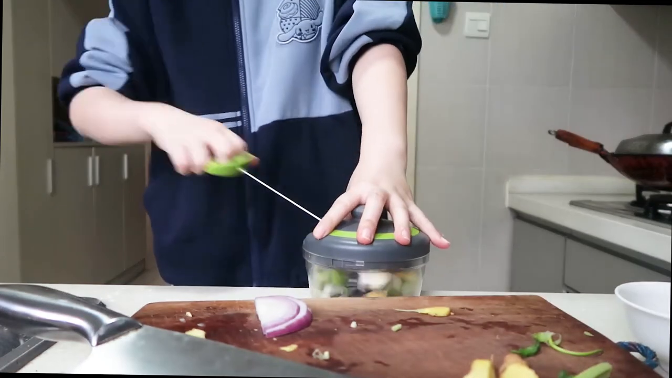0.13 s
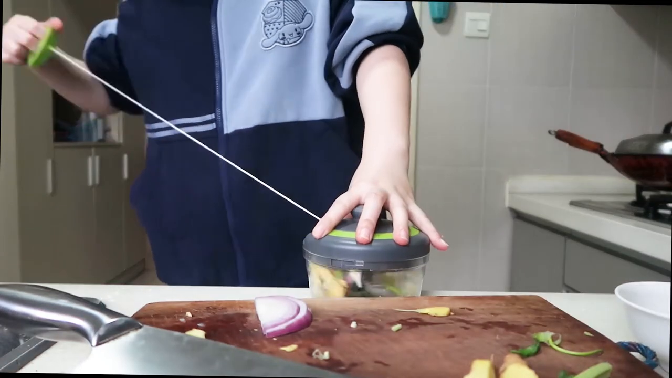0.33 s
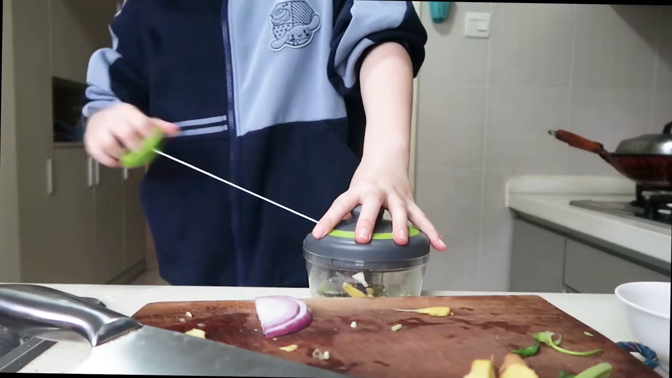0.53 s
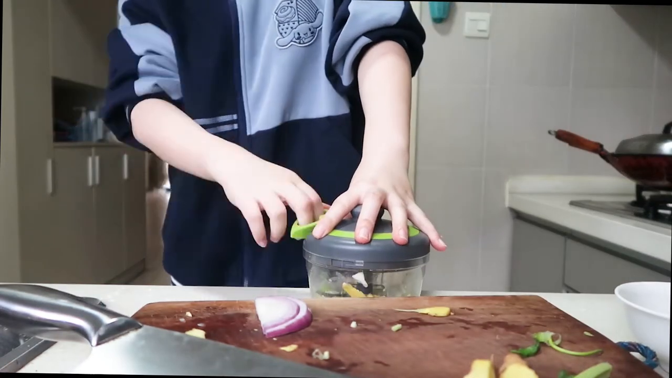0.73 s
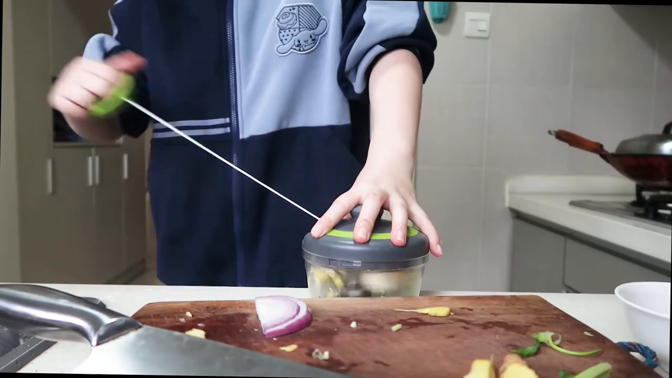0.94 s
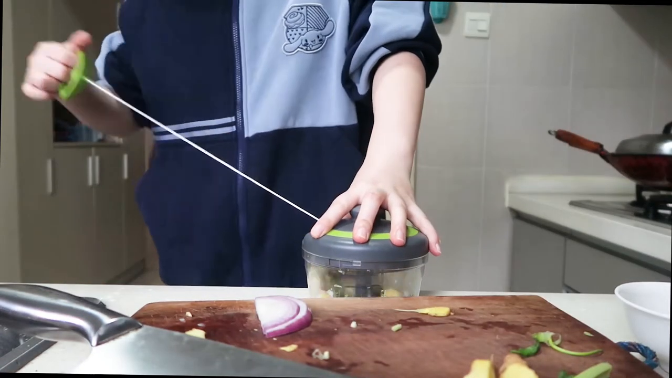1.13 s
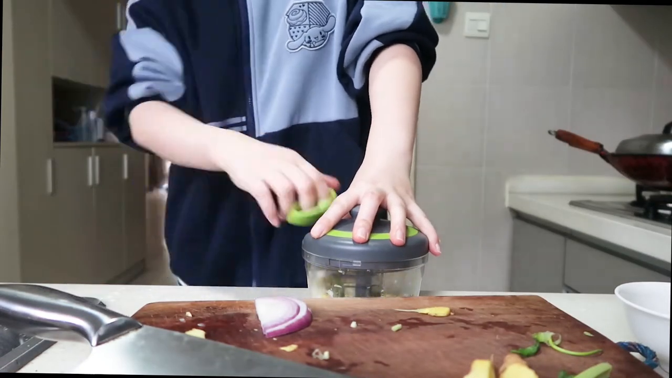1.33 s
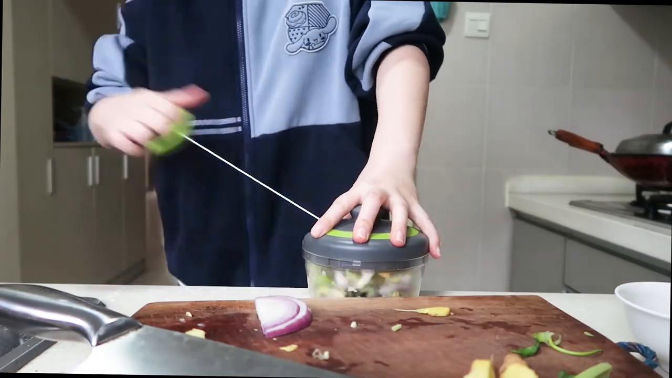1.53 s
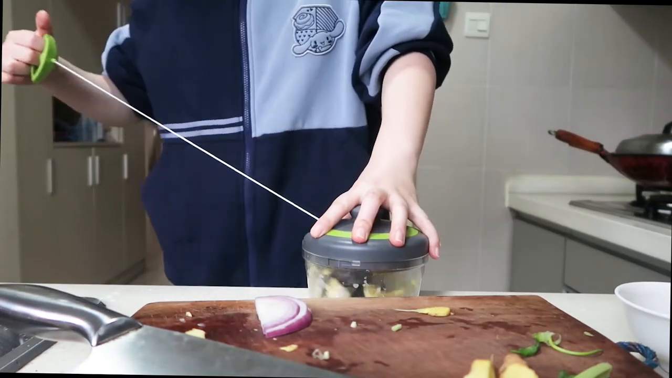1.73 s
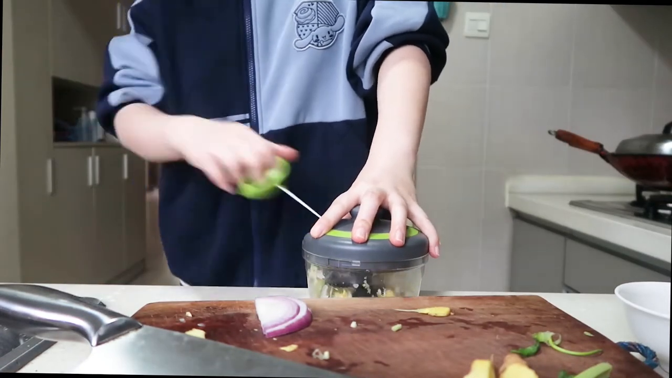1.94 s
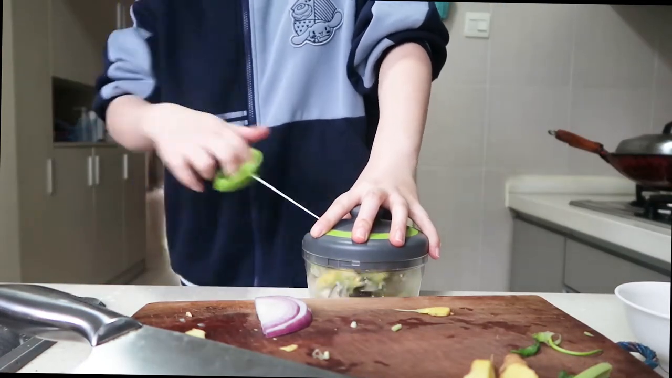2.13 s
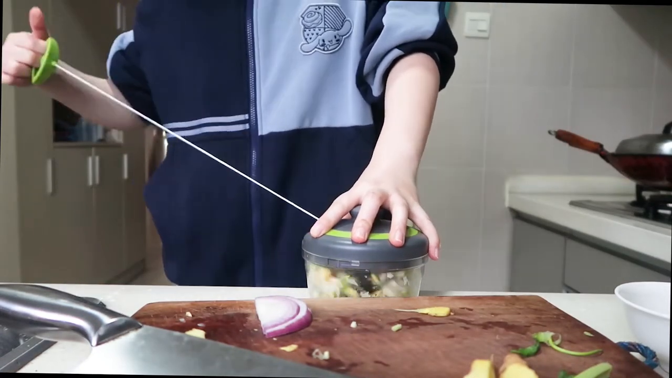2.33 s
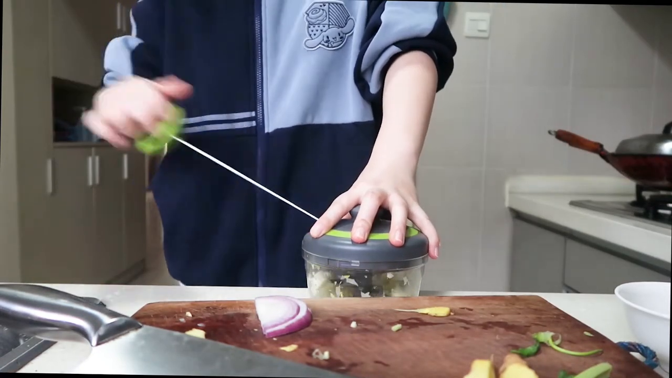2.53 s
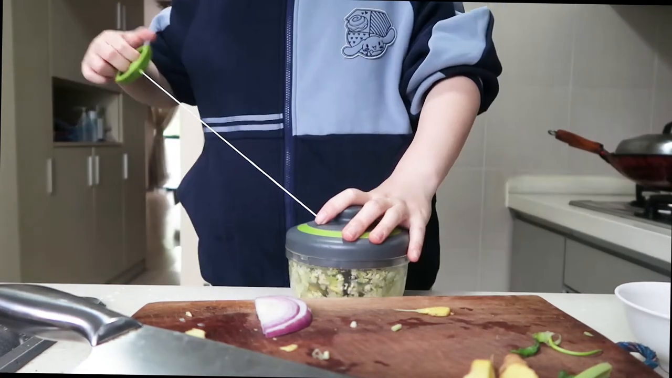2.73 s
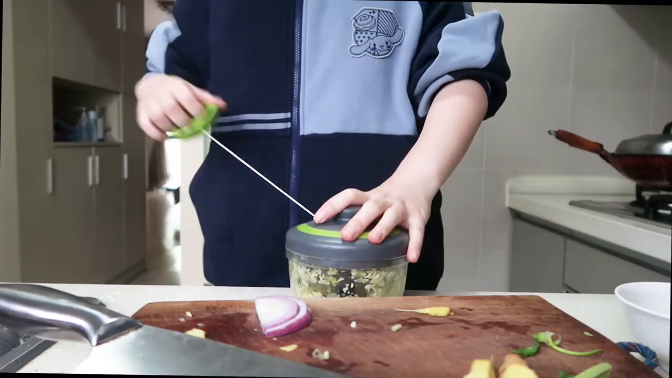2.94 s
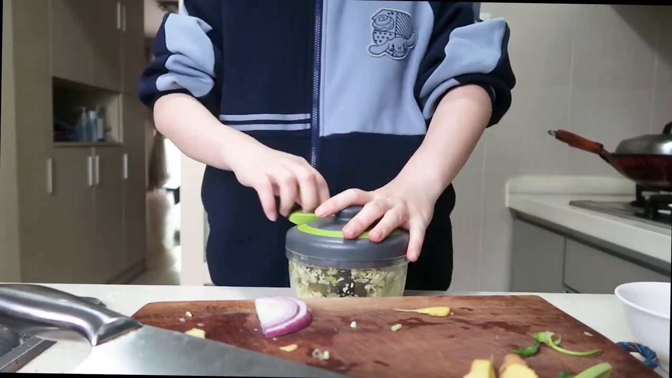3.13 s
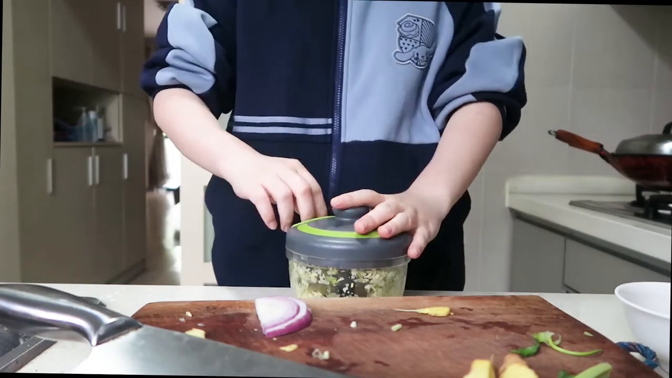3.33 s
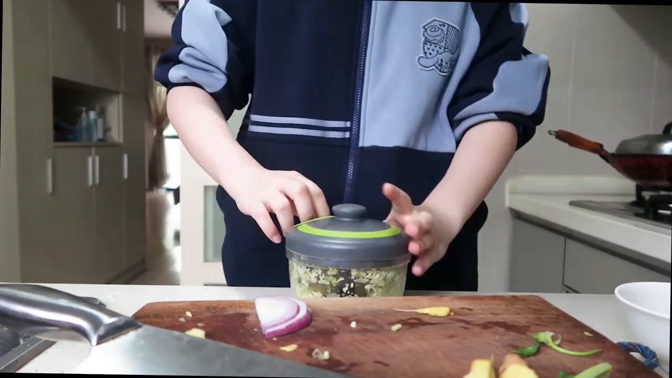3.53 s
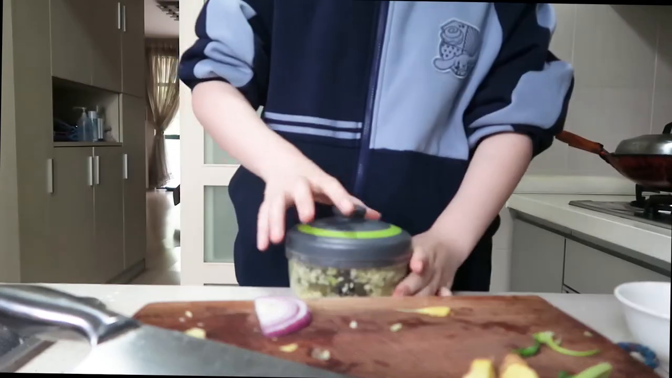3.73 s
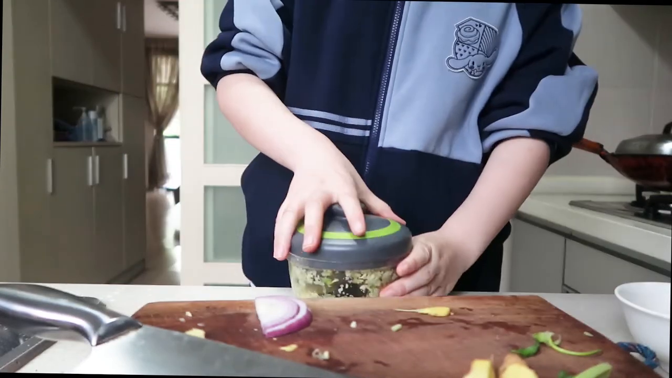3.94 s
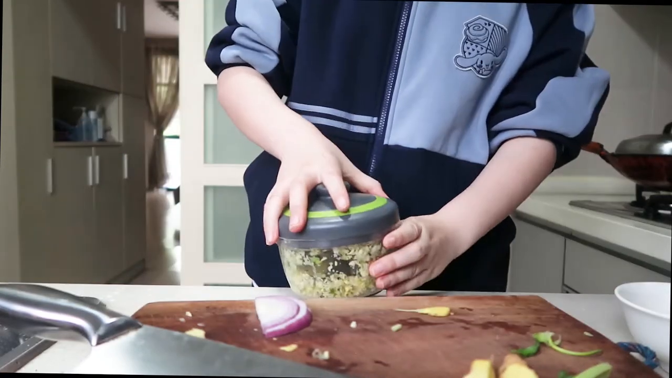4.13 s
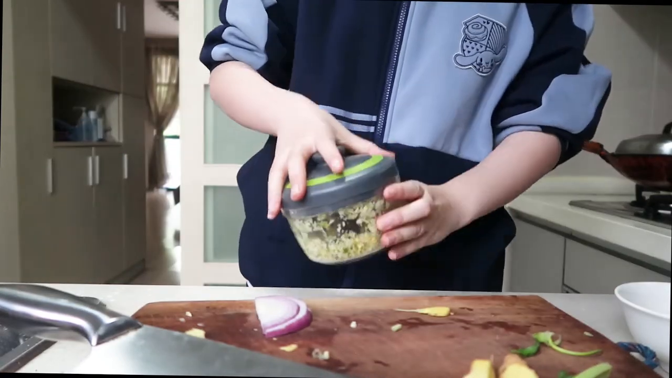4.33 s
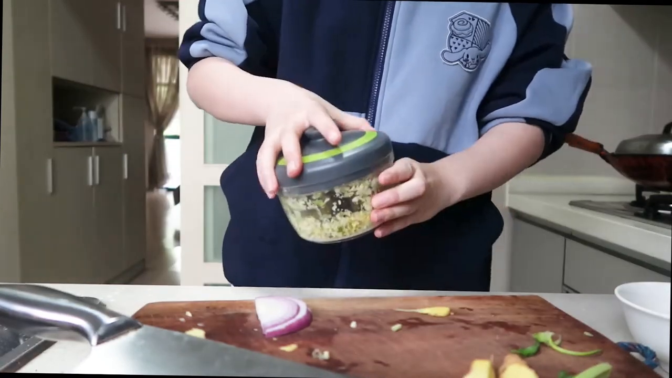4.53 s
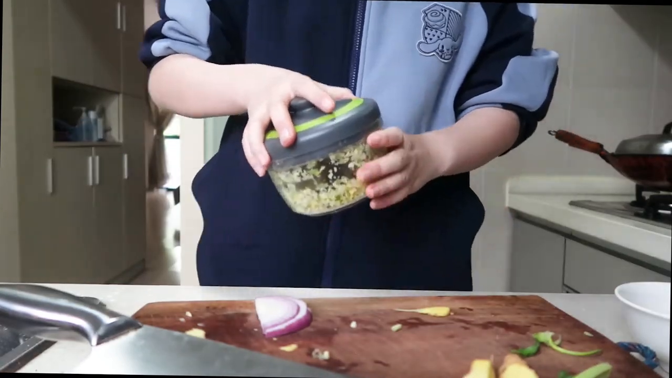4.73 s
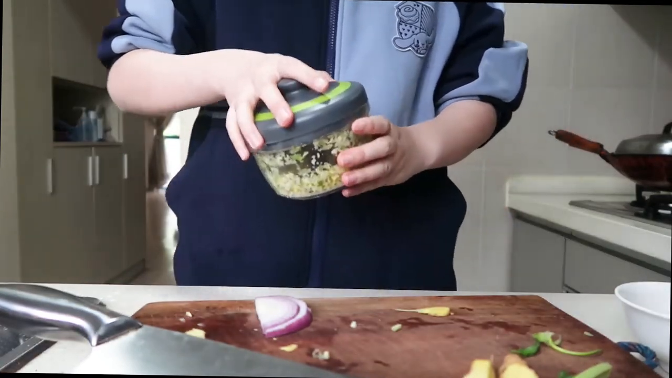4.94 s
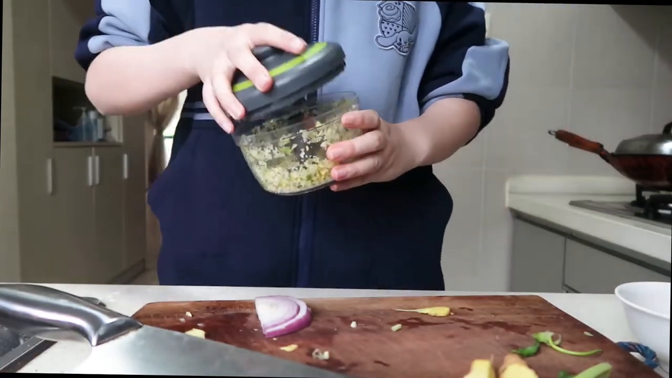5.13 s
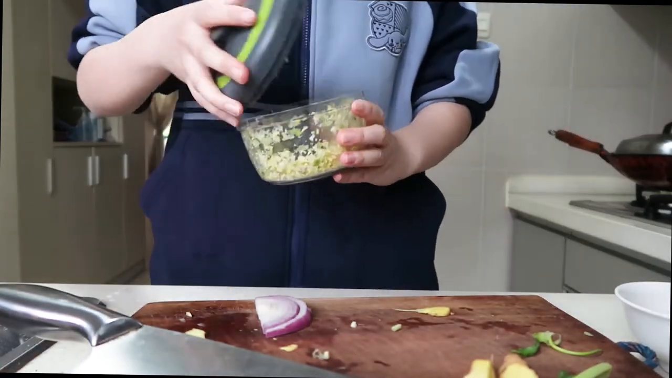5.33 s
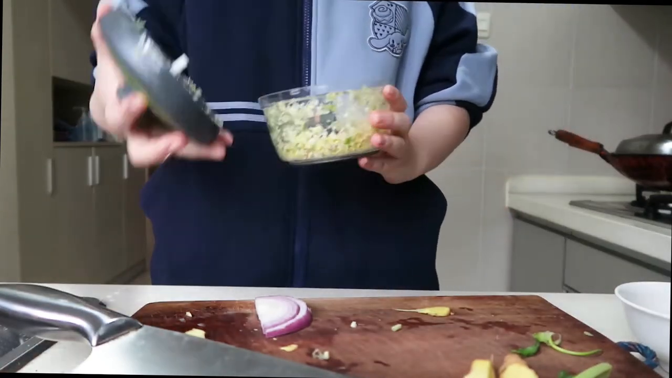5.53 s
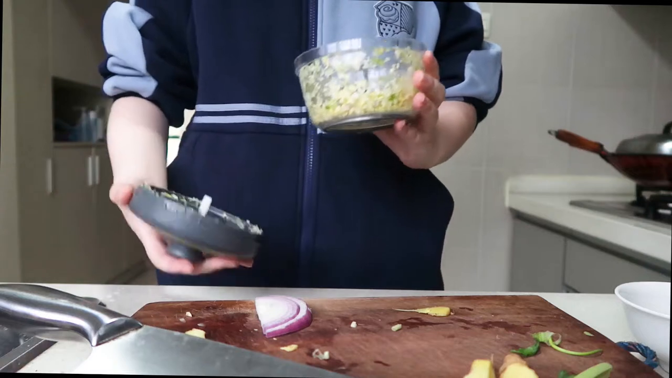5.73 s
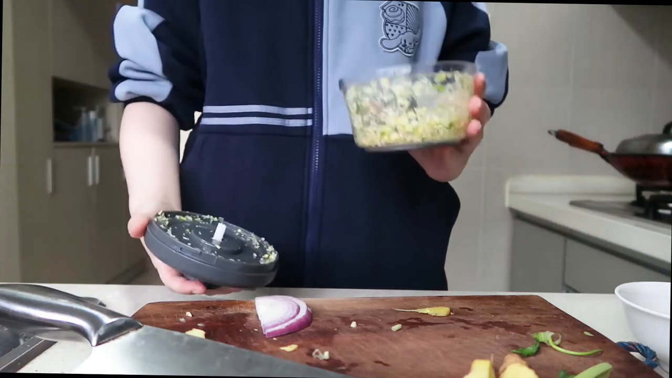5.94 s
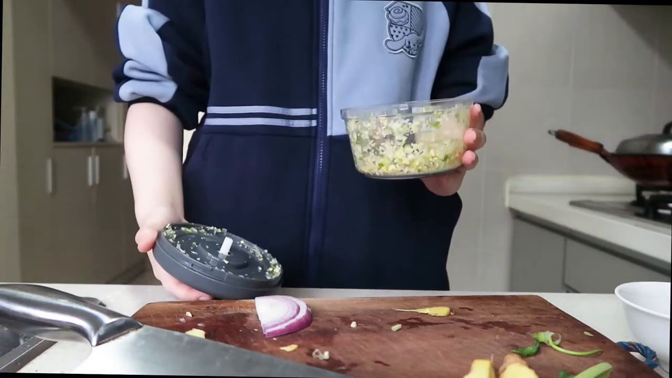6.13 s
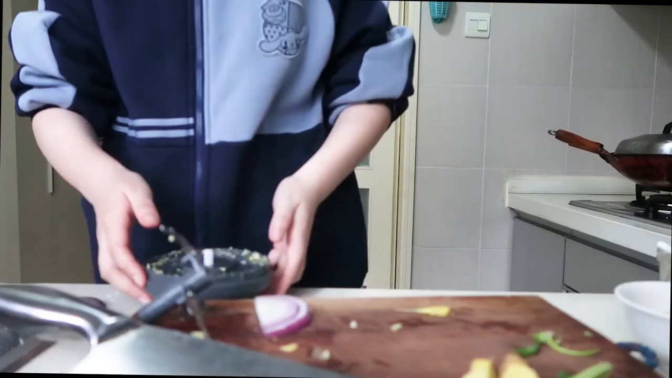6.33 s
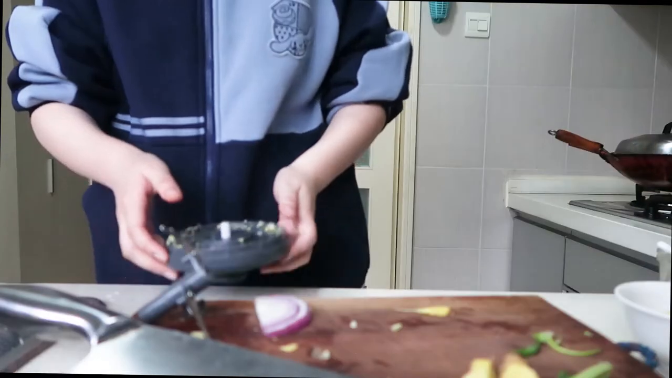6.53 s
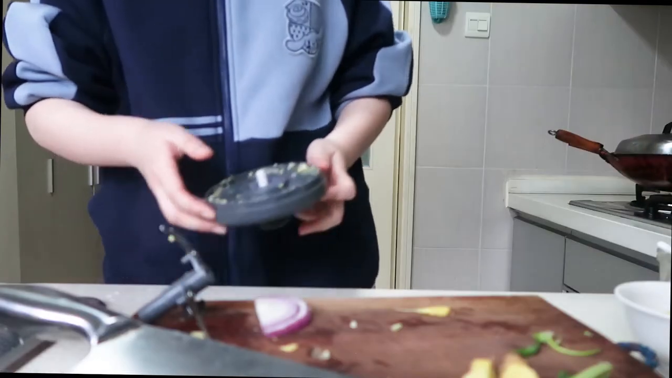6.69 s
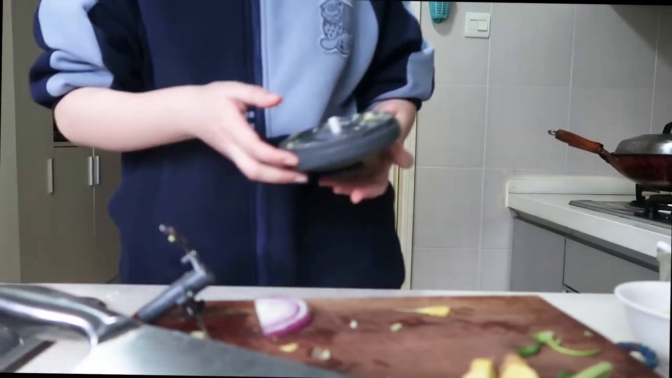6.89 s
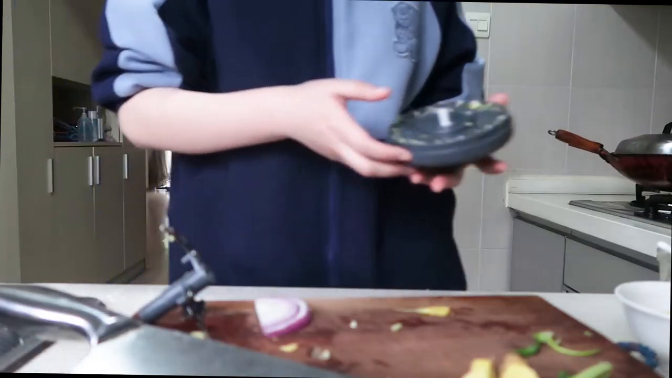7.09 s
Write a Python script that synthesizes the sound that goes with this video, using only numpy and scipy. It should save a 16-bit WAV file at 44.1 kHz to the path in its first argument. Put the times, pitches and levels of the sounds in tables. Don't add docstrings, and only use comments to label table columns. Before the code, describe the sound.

Close in a small tiled kitchen, a manual chopper is pulled about five times in three seconds, blades rattling food against plastic, with hard clicks and hissing, ringing spring rewinds between. The handle snaps home, the lid knocks and, after a quiet gap, stutters off with a hollow rising pop. A dull knock follows as parts are set down, its tail cut short, then near quiet with faint hum.

```python
import sys
import numpy as np
from scipy import signal
from scipy.fft import rfft, irfft, next_fast_len
from scipy.io import wavfile
from scipy.ndimage import uniform_filter1d, minimum_filter1d

SR = 44100
rng = np.random.default_rng(int(sys.argv[2]) if len(sys.argv) > 2 else 0)


def to_linear_factor(level_db):
    exponent = np.asarray(level_db, float) / 20
    return 10 ** exponent


def dump_mix(stems):
    frames = np.atleast_2d(stems).T
    limited = np.clip(frames, -1, 1)
    pcm = np.round(limited * 32767).astype(np.int16)
    wavfile.write(sys.argv[1], SR, pcm)


N = 315838


def evened(x):
    return x / np.sqrt(np.mean(x ** 2) + 1e-20)


def smoothed(x, size):
    return uniform_filter1d(uniform_filter1d(x, size), size)


def coloured(x, points, turn=1):
    f, db = np.transpose(points)
    size = next_fast_len(len(x))
    hz = np.fft.rfftfreq(size, 1 / SR)
    gain = to_linear_factor(np.interp(np.log(hz + 1), np.log(f + 1), db))
    return irfft(rfft(x, size) * turn * gain, size)[:len(x)]


def passband(x, lo_hz, hi_hz):
    return signal.sosfilt(signal.butter(3, [lo_hz, hi_hz], "band", fs=SR, output="sos"), x)


def ring(x, hz, width):
    r = np.exp(-np.pi * width / SR)
    return 2 * signal.lfilter([1 - r], [1, -r * np.exp(2j * np.pi * hz / SR)], x + 1e-18).real


def resonate(x, hz, width):
    turn = np.exp(2j * np.pi * np.cumsum(hz * np.ones(len(x))) / SR)
    r = np.exp(-np.pi * width / SR)
    return 2 * (turn * signal.lfilter([1 - r], [1, -r], x / turn + 1e-18)).real


def grains(per_s, spread_db, clump_db):
    present = rng.random(N) < per_s / SR
    size = np.minimum(rng.exponential(1, N), 4)
    sign = rng.choice([-1, 1], N)
    clump = evened(smoothed(rng.standard_normal(N), 200))
    return evened(sign * present * to_linear_factor(spread_db * size + clump_db * clump))


def rung(drive, modes, lo_hz, hi_hz, dull_db):
    modal = sum(to_linear_factor(db) * ring(drive * rng.standard_normal(N), hz, width) for hz, width, db in modes)
    dull = evened(passband(drive, lo_hz, hi_hz))
    return evened(passband(evened(modal) + to_linear_factor(dull_db) * dull, lo_hz, hi_hz))


def swell(s, held, db, rise, fall, sag=0):
    t = np.arange(0, N, 32) / SR - s
    return to_linear_factor(db - rise * np.maximum(-t, 0) - sag * np.clip(t, 0, held) - fall * np.maximum(t - held, 0))


def joined(gains):
    steps = np.repeat(np.sqrt(sum(g ** 2 for g in gains)), 32, axis=-1)
    return uniform_filter1d(steps, size=32, axis=-1)[..., :N]


# (f/Hz, density/dB per Hz)
FLOOR_SPECTRUM = [(25, -7.5), (40, -7.5), (97, -3), (243, -8.5), (310, -7.5), (370, -10.5), (600, -16),
                  (1470, -19.5), (3230, -22), (5000, -29), (8500, -34.5), (12000, -34), (13300, -35),
                  (15500, -81)]
# (f/Hz, side re mid/dB)
FLOOR_SIDE = [(60, -31), (180, -8), (550, 2.5), (1650, -1), (4970, -2), (15000, 5)]
# (loudest t/s, held/s, level/dB, rise/dB per s, fall/dB per s)
DRONE_SWELLS = [(4.09, 0.015, -60.5, 94, 200), (4.35, 0.35, -64, 200, 48), (5.03, 0, -53, 260, 75),
                (5.5, 0.055, -53, 66, 130), (5.759, 0.22, -56, 277, 100), (6.26, 0, -36.5, 218, 342),
                (6.61, 0.0067, -52, 117, 398), (6.77, .39, -65, 404, 96.5)]


def background():
    floor_db = -60.5
    hum_hz, hum_db, whine_hz, whine_db = 298, -62.5, 13001, -92
    drone_hz, drone_width = 107, 5.6
    mid_noise, side_noise, slow_noise = rng.standard_normal((3, N))
    t = np.arange(N) / SR
    drift = to_linear_factor(0.39 * evened(smoothed(slow_noise, 6000)))
    mid = drift * to_linear_factor(floor_db) * evened(coloured(mid_noise, FLOOR_SPECTRUM))
    side = coloured(to_linear_factor(floor_db) * evened(coloured(side_noise, FLOOR_SPECTRUM)), FLOOR_SIDE)
    hum = to_linear_factor(hum_db + 3.5) * np.sin(2 * np.pi * hum_hz * t)
    whine = to_linear_factor(whine_db + 3) * np.sin(2 * np.pi * whine_hz * t)
    drone = evened(ring(ring(slow_noise, drone_hz, drone_width), drone_hz, 30))
    drone *= joined(swell(*row) for row in DRONE_SWELLS)
    return np.array([mid + hum + whine + drone, side])


# (f/Hz, t60/s)
ROOM_T60 = [(100, 0.38), (400, 0.32), (1500, 0.3), (4000, 0.32), (9000, 0.416), (14000, 0.057)]


def kitchen(x):
    room_db = -6
    turn_hz = 2.3
    taps = np.zeros((6, SR // 2))
    at = np.arange(130, SR // 2 - 20, 20)
    at = at + rng.integers(0, 20, (6, len(at)))
    np.put_along_axis(taps, at, rng.choice([-1., 1.], at.shape), 1)
    hz, t, z = signal.stft(taps, SR, nperseg=256)
    t60 = np.interp(hz, *np.transpose(ROOM_T60))[:, None]
    tail = signal.istft(z * to_linear_factor(-60 * t / t60), SR, nperseg=256)[1].reshape(2, 1, 3, -1)
    tail = tail / np.linalg.norm(tail[0, 0, 0])
    phase = turn_hz * np.arange(N) / SR + np.arange(3)[:, None] / 3
    turn = np.sqrt(2 / 3) * np.cos(2 * np.pi * phase)
    wet = signal.fftconvolve(x[:, :, None] * turn, tail, axes=3)[..., :N]
    return wet.sum(axis=2) * to_linear_factor(room_db)


# (loudest t/s, held/s, level/dB, rise/dB per s, fall/dB per s)
SEAL_SLIPS = [
    (4.94, .05, -56.5, 112, 299),
    (5.04, 0.00031, -29.5, 550, 483.5),
    (5.209, 0.0032, -34.5, 902, 302),
    (5.255, 0, -18, 1297.5, 480),
]
# (t/s, f/Hz)
BOWL_AIR = [(4.85, 321), (5.15, 320), (5.21, 400), (5.255, 650), (5.28, 790), (5.45, 754)]
# (loudest t/s, held/s, level/dB, rise/dB per s, fall/dB per s)
RUBS = [(3.743, 0.036, -38, 613, 1996), (4.056, 0, -62, 275.5, 325.5), (5.044, 0, -30.5, 1500, 1100),
        (5.21, 0.052, -43, 2000, 477), (5.654, 0.025, -51.5, 2000, 539.5), (5.8, 0.027, -64, 1002.5, 500),
        (6.542, 0.0027, -34, 600, 480), (7.023, 0.08, -64.5, 2000, 296.5), (7.097, 0.014, -51, 400, 400)]
# (rim f/Hz, its width/Hz, hollow part f/Hz, its width/Hz, hollow level re rim/dB)
RUBBED_PARTS = [(1630, 900, 450, 215, -10.5), (1580, 900, 390, 340, 7.5), (1920, 670, 370, 210, -30),
                (1850, 1000, 490, 220, -19), (1490, 510, 1000, 340, -6), (2010, 183, 530, 360, -10),
                (1590, 180, 330, 450, -7.5), (1980, 600, 830, 61, 20), (2070, 240, 430, 150, -2)]


def lid():
    slips = grains(per_s=1500., spread_db=5.0, clump_db=0.5)
    hz = np.interp(np.arange(N) / SR, *np.transpose(BOWL_AIR))
    air = evened(resonate(resonate(slips, hz, 220), hz, 450))
    out = joined(swell(*row) for row in SEAL_SLIPS) * to_linear_factor(-4) * air
    slips = grains(per_s=6000., spread_db=2.0, clump_db=2.5)
    for row, (hz, width, hollow_hz, hollow_width, hollow_db) in zip(RUBS, RUBBED_PARTS):
        peak = round(row[0] * SR)
        span = slice(peak - 5000, peak + 7000)
        rim = evened(passband(ring(slips[span], hz, width), 1000, 3600))
        rim += to_linear_factor(-9) * evened(passband(slips[span], 1200, 3500))
        hollow = evened(passband(ring(slips[span], hollow_hz, hollow_width), 440, 1060))
        gesture = joined([swell(*row)])[span]
        out[span] += to_linear_factor(-6.5) * gesture * (rim + to_linear_factor(hollow_db) * hollow)
    return out


def hit(draw, db, hz, low_db, thump_db, crack_db, sharp):
    t = np.arange(len(draw)) / SR
    contact = (t == 0) * sharp
    blow = contact + draw
    burst = blow * to_linear_factor(-60 * t * sharp / .09)
    snap = (draw[::-1] - contact / 2) * to_linear_factor(-60 * t * sharp / .08)
    overtone = (hz < 1250) * ring(burst, 2.02 * hz, 300)
    rings = ring(burst, hz, 480) + overtone
    knock = ring(blow * to_linear_factor(-60 * t / 0.034), 520, 410)
    parts = [(0, passband(1.8 * rings + burst, 950, 3300)),
             (low_db, passband(knock, 310, 710)),
             (thump_db, passband(blow * to_linear_factor(-60 * t / 0.092), 84, 260)),
             (crack_db, passband(snap, 2600, 4200)),
             (crack_db - 8, passband(draw * to_linear_factor(-60 * t / 0.075), 3600, 15000))]
    return to_linear_factor(db) * sum(to_linear_factor(g) * p / abs(p).max() for g, p in parts)


# (t/s, peak level/dB, ring f/Hz, sharp crack level re peak/dB)
CLICKS = [(0.0273, -18, 1600, -23), (0.1507, -9.5, 1710, -7), (0.9334, -18.5, 1590, -14),
          (0.989, -13.5, 1580, -17.5), (1.0296, -6, 1360, -23), (1.187, -12.5, 1630, -7.5),
          (1.3404, -16, 1350, -18), (1.378, -8, 2330, -17), (1.5262, -9.5, 2350, -14),
          (1.5778, -9, 2100, -7.5), (1.6596, -17, 1370, 4.5), (1.967, -8, 2580, -22.5),
          (2.0112, -8.5, 2210, -22), (2.0444, -7.5, 2100, -20), (2.2921, 0, 1560, -32),
          (2.3058, -5.5, 1630, -10.5), (2.3585, -5.5, 1570, -1.5), (2.4367, -4.5, 2230, -16),
          (2.4919, -12.5, 1920, -15), (2.6813, -11, 2260, -8.5), (2.693, -8.5, 2260, -26.5),
          (2.7126, -6.5, 2300, -30.5), (2.825, -4.5, 2520, -4.5), (2.842, -12.5, 1120, -11),
          (3.0304, -4.5, 2240, -34.5), (3.039, -10.5, 2320, -11.5), (3.0822, -9, 2330, -28.5)]
# (t/s, peak level/dB, ring f/Hz, low knock level re peak/dB, sharp crack level re peak/dB)
KNOCKS = [(3.311, -1, 2000, -13.5, -38), (3.5275, -5.5, 2340, -26, -6), (3.7575, 3.5, 2220, -16.5, -2.5),
          (3.9483, -39, 2110, -6, -14), (4.8715, -52, 2270, -10.5, -4), (5.017, -46.5, 1570, 9, 5),
          (5.043, -29, 1970, -7, 1), (5.2051, -24.5, 2090, -15, -11), (5.245, -15, 1900, -38, -30),
          (5.6535, -47, 1410, -7, -3), (5.795, -54.5, 2030, -9, -4), (6.2249, -8, 1036, -6.5, -33),
          (6.4887, -53.5, 2080, 5, 7), (7.0227, -53.5, 1040, 7.5, -32)]


def hits(first_s, last_s):
    click_knock_db, click_thump_db = -14, -26.5
    thump_db = -17.5
    click_sharp, knock_sharp = 3.5, 8
    rows = [(s, db, hz, click_knock_db, click_thump_db, crack_db, click_sharp)
            for s, db, hz, crack_db in CLICKS]
    rows += [(s, db, hz, low_db, low_db + thump_db, crack_db, knock_sharp)
             for s, db, hz, low_db, crack_db in KNOCKS]
    out = np.zeros(N + 6000)
    draws = rng.standard_normal((len(rows), 6000))
    for draw, (s, *row) in zip(draws, rows):
        if first_s <= s < last_s:
            out[round(s * SR):][:6000] += hit(draw, *row)
    return out[:N]


# (full speed from t/s, held/s, rattle level/dB, sag/dB per s, counter shake level re rattle/dB)
PULLS = [(.04, 0.024, -33, -7, 10.5), (.16, 0.023, -26.5, -6.5, -15.5), (.262, 0.21, -18.5, 0, -8),
         (.938, 0.031, -31.5, 2, -9), (.998, 0.18, -21.5, -9.5, -7), (1.66, 0.16, -19, 3, -6),
         (2.29, 0.18, -23, 0.5, -13), (2.84, 0.07, -26, 1.5, -4.5)]
REWINDS = [(.635, 0.22, -26, 58.5, -9.5), (1.295, 0.17, -28, -3, -10), (1.985, 0.13, -24.5, 15, -5),
           (2.64, .13, -29, -10, -11), (3.05, 0.26, -27, 49.5, -0.5)]
# (f/Hz, density/dB per Hz)
SCRAPE_HISS = [(2650, -41), (4500, -9), (5390, -12.5), (8460, -1.5), (9680, -10.5), (12500, 9),
               (14300, -13), (14900, -30.5), (15500, -93)]
# (rise/dB per s, fall/dB per s)
PULL_SPOOL, REWIND_SPOOL = (430, 210), (320, 170)
# (hiss level/dB, spring ring level/dB, squeak level/dB, squeak f/Hz)
PULL_COIL, REWIND_COIL = (-47.5, -49, -42, 6417), (-34.5, -22, -38.5, 7293.5)


def spool():
    follow, sag_follow = 0.92, 0.8
    full_db = -20
    scrape = grains(per_s=13000.0, spread_db=3.5, clump_db=2.0)
    hiss = evened(coloured(scrape, SCRAPE_HISS))
    spring = evened(ring(ring(scrape, 4140, 97), 4140, 220))
    out = np.zeros(N)
    for rows, edges, coil in ((PULLS, PULL_SPOOL, PULL_COIL), (REWINDS, REWIND_SPOOL, REWIND_COIL)):
        hiss_db, ring_db, squeak_db, squeak_hz = coil
        speed = joined(swell(s, held, follow * (db - full_db), *edges, sag_follow * sag)
                       for s, held, db, sag, _ in rows)
        squeak = evened(passband(ring(scrape, squeak_hz, 350), 3500, 12000))
        out += speed * (to_linear_factor(hiss_db + 16) * hiss + to_linear_factor(ring_db - 9) * spring + to_linear_factor(squeak_db) * squeak)
    return out


# (f/Hz, width/Hz, level/dB)
WALL_MODES = [(1350, 220, 14), (1600, 110, 8), (2100, 190, 16), (2410, 170, 4.5)]
STEEL_MODES = [(3150, 120, 4), (3426, 140, 3), (3430, 110, -10.5)]
BODY_MODES = [(308, 170, 0), (432, 36, 2.5), (590, 44, -5.5), (790, 100, -1)]
COUNTER_MODES = [(119, 20, 0), (88, 30, -10), (160, 40, -8)]
# (rise/dB per s, fall/dB per s)
PULL_BLADES, REWIND_BLADES = (550, 330), (207, 140)
PULL_BOWL, REWIND_BOWL = (-5, -3.5, -18), (-9, -3, -4.5)


def blades():
    sheen_db = -17
    pawl_hz, pawl_width = 2330, 350
    strokes = []
    for rows, edges, parts_db in ((PULLS, PULL_BLADES, PULL_BOWL), (REWINDS, REWIND_BLADES, REWIND_BOWL)):
        for s, held, db, sag, shake_db in rows:
            levels = to_linear_factor([0, shake_db, *parts_db])[:, None]
            strokes.append(swell(s, held, db, *edges, sag) * levels)
    wall, counter, steel, body, pawl = joined(strokes)
    blows = grains(per_s=2700.0, spread_db=1.26, clump_db=1.5)
    out = wall * rung(blows, WALL_MODES, 973, 2820, 1)
    out += steel * rung(blows, STEEL_MODES, 2584, 4520, 0.5)
    out += steel * to_linear_factor(sheen_db) * evened(passband(blows * rng.standard_normal(N), 4800, 6000))
    out += pawl * evened(ring(ring(blows * rng.standard_normal(N), pawl_hz, pawl_width), pawl_hz, 900))
    out += body * rung(blows, BODY_MODES, 210, 995, 3.5)
    return out + counter * to_linear_factor(-6.0) * rung(blows, COUNTER_MODES, 58, 210, -15.5)


# (f/Hz, side re mid/dB)
PORTS = [(60, -33), (120, -70.5), (240, -42), (480, -22.5), (950, -17), (1890, -24.5), (3770, -11),
         (7520, -0.5), (15000, 7.5)]
# (f/Hz, level/dB)
MIC = [(40, -2.5), (100, 3.5), (4200, -1), (4700, 0), (9000, -10), (10000, -11), (12500, -23),
       (14000, -16.5), (16000, -23)]


def microphone(direct, wet):
    near = rng.standard_normal(400) * to_linear_factor(-60 * np.arange(400) / SR / 0.011)
    mirrored = signal.oaconvolve(direct, near / np.linalg.norm(near))[:N]
    mirrored *= evened(smoothed(rng.standard_normal(N), 150))
    side = coloured(direct, [(20, -11), (20000, -19.0)], -1j) + mirrored + to_linear_factor(3.5) * wet[1]
    side = coloured(side, PORTS)
    return np.array([coloured(v, MIC) for v in (direct + wet[0], side)])


def scene():
    change_s = 6.31
    before = np.arange(N) < change_s * SR
    rubbing = lid()
    first = blades() + spool() + hits(0, change_s) + rubbing * before
    second = hits(change_s, 9) + rubbing * ~before
    wet = kitchen(np.array([[first, second]]))
    direct = first * before + second
    wet = wet[:, 0] * before + wet[:, 1]
    mid, side = microphone(direct, wet) + background()
    return np.array([mid + side, mid - side])


def top_cut(x):
    return signal.sosfilt(signal.butter(12, 16500, fs=SR, output="sos"), x)


def record(dry):
    room_left = np.minimum(.95 / (abs(dry).max(0) + 1e-9), 1)
    gain = uniform_filter1d(minimum_filter1d(room_left, size=129), size=129)
    return top_cut(dry * gain)


dry = scene()
out = record(dry)
dump_mix(out)
```